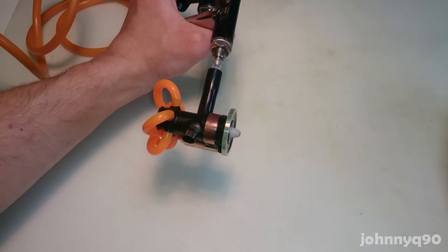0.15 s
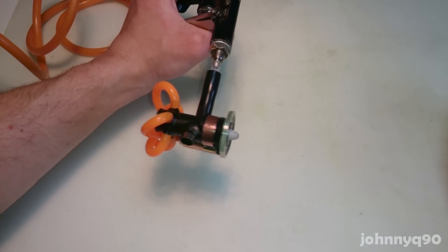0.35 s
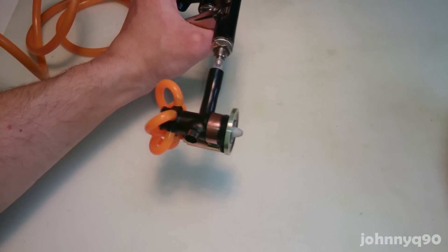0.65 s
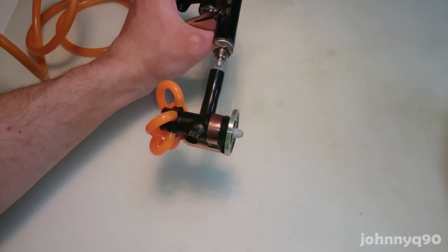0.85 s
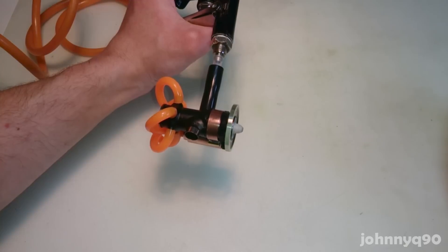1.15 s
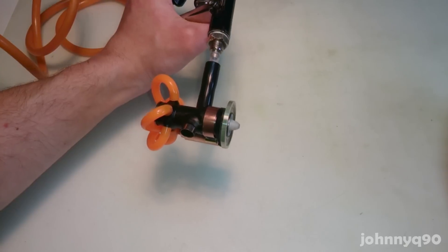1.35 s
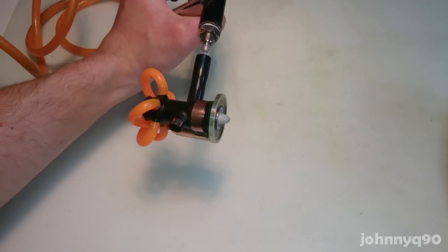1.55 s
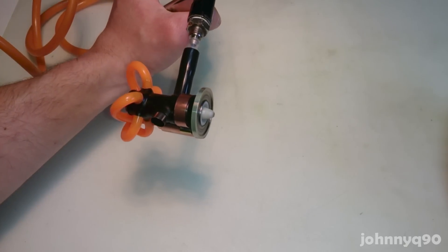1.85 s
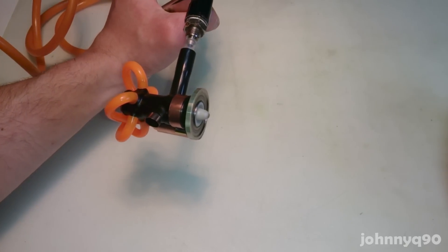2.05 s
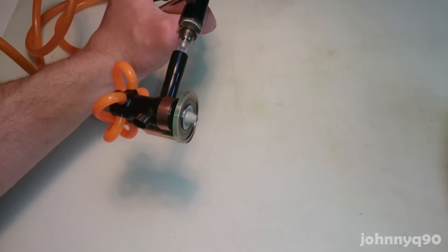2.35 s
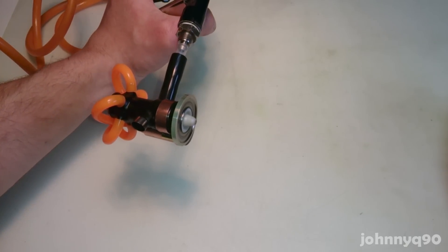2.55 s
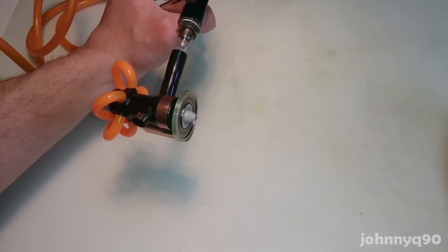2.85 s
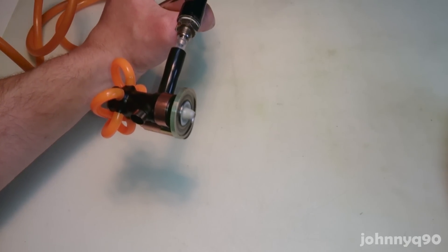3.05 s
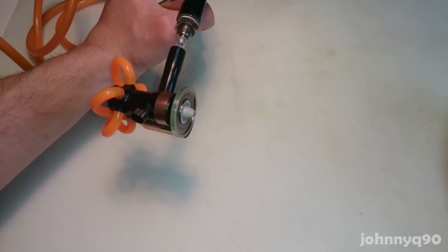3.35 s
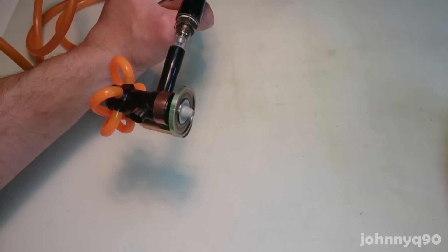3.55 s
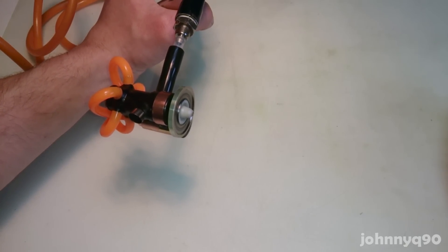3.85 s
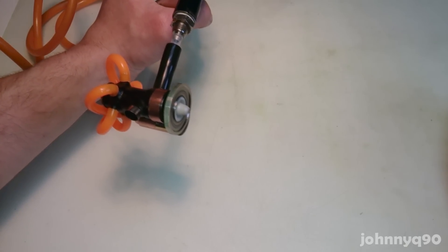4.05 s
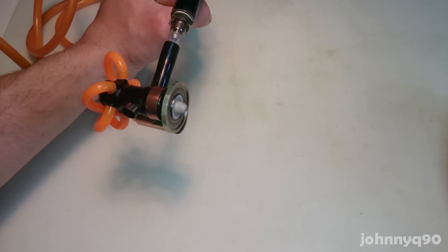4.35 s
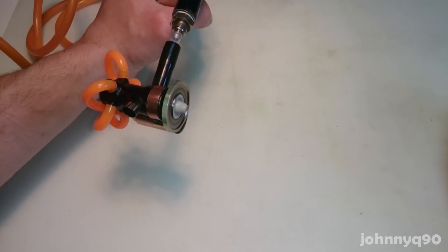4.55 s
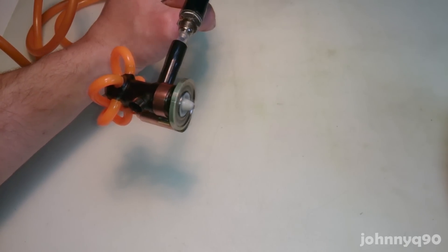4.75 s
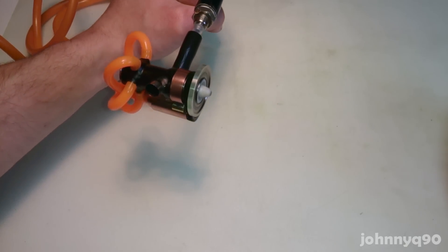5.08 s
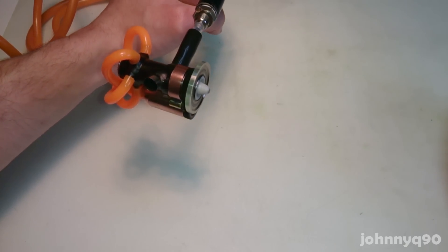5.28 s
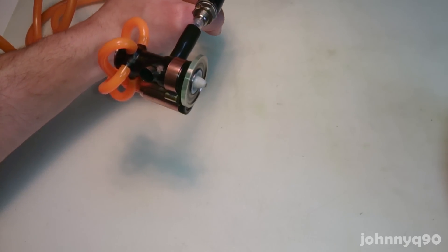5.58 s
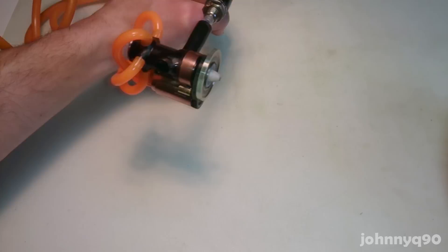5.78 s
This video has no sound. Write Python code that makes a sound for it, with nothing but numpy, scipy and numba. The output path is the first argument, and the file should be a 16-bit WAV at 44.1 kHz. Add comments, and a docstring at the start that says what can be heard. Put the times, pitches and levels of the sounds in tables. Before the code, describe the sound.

A small air-driven rotor whines and hisses, coasts down with a dry metallic rattle, then spins up again in a climbing whine.

```python
"""A small hand-held rotary air engine runs above a table, fed from a blow gun.
Its rotor chops the air five times a turn into a rising whine, wrapped in exhaust rush and jet hiss.
At 1 s the air is shut off and the engine coasts down with a dry metallic rattle and a few hard knocks.
From 2.56 s the air drives it up again; the whine climbs until the trigger eases at the very end."""
import sys
import numpy as np
from scipy import signal
from scipy.fft import rfft, irfft, next_fast_len
from scipy.io import wavfile
from numba import njit

SR = 44100
rng = np.random.default_rng(int(sys.argv[2]) if len(sys.argv) > 2 else 0)


def generate_wav(sig):
    """Save sig (samples, or channels by samples) to the path in sys.argv[1] as 16-bit PCM at SR."""
    pcm = np.round(np.clip(np.atleast_2d(sig).T, -1, 1) * 32767).astype(np.int16)
    wavfile.write(sys.argv[1], SR, pcm)


N = 261072
TIME = np.arange(N) / SR
FREQS = np.arange(N // 2 + 1) * SR / N
PUFFS_PER_TURN, CRUISE_PUFF_HZ = 5, 700

# squeezes of the blow gun's trigger: (opens [s], fully shut [s], extra chamber drive [dB])
TRIGGER_SQUEEZES = [(-1, 1.03, 2.3), (2.56, 5.962, 0)]
# air pressure while the trigger is held: (time [s], relative level [dB])
AIR_PRESSURE = [(.9, 1.7), (2.7, -.3), (3.75, 0), (3.9, .9), (4.55, .8), (4.92, -.5), (5.02, 1.9),
                (5.75, 2.2)]
# rotor speed, the pitch of the whine: (time [s], puff rate [Hz])
ROTOR_SPEED = [(0, 733), (.2, 795), (.5, 859), (.75, 898), (.88, 882), (1, 852), (2.56, 497), (2.7, 499),
               (3.4, 574), (3.78, 592.5), (4.2, 637), (4.68, 674), (4.96, 680.5), (5.5, 737), (5.77, 755),
               (5.92, 747)]
# partials of the whine: (multiple of puff rate [x], level at cruise [dB], change per speed doubling [dB])
WHINE_HARMONICS = [(1, -1.2, -1.9), (2, -.6, 1), (3, -2.2, 7), (4, -8, -7)]
# resonances of the outlet and its surroundings: (centre [Hz], width [Hz], gain [dB])
OUTLET_RESONANCES = [(537, 150, -37.5), (592, 44, -36), (617, 28, -36), (657, 20, -40.5), (696, 32, -32),
                     (760, 90, -31.5), (823, 62, -28), (878, 82, -39), (1056, 200, -34.5), (1405, 250, -28),
                     (1591, 89, -34), (1775, 260, -26), (2060, 230, -27), (2360, 340, -23.5),
                     (3100, 1400, -36)]
# midrange body of the exhaust: (frequency [Hz], relative level [dB])
EXHAUST_EQ = [(40, -44), (150, -31.5), (300, -19), (470, -14), (650, -22), (850, -15), (1150, -18),
              (1400, -7), (1650, -2), (2100, 2), (2600, -3.5), (3400, -10.5), (6000, -63)]
# bright top of the jet: (frequency [Hz], relative level [dB])
JET_EQ = [(1500, -38), (2800, -16.5), (3700, -12), (4600, -12), (6300, -11.5), (7400, -7), (8700, -4.5),
          (9900, .5), (10800, -2.5), (12200, -4), (13200, -9), (15000, -8), (15700, -11)]
# breathy whistle of leaking air: (time [s], pitch [Hz], relative level [dB])
LEAK_WHISTLE = [(0, 11820, 8.5), (.9, 11820, 7.5), (2.6, 11350, 6), (4.1, 11250, 4.5), (5.2, 10540, 2),
                (5.9, 10580, 9)]
# partials of the turning rotor: (multiple of turning rate [x], relative level [dB])
SHAFT_HARMONICS = [(1, 0), (2, 0), (3, -10), (6, 0), (7, -4)]
# resonances of the housing: (centre [Hz], width [Hz], gain [dB])
HOUSING_RESONANCES = [(136, 24, -52.5), (172, 130, -53.5), (248, 90, -54.5), (335, 85, -49),
                      (462, 110, -41.5), (1050, 700, -54.5)]
# lower notch in the hiss, shifting as the engine is turned: (time [s], centre [Hz], depth [0-1])
LOWER_NOTCH = [(0, 3600, 0.7), (1, 3640, 0.84), (2.6, 3500, 0.74), (3.6, 3420, 0.5), (4.6, 3450, 0.59),
               (5.3, 3680, 0.39), (5.9, 3930, 0.36)]
# its upper companion: (time [s], centre [Hz], depth [0-1])
UPPER_NOTCH = [(0, 3900, 0.87), (1, 3920, 0.76), (2.6, 4640, .15), (3.3, 4600, 0.24), (4.4, 4700, 0.85),
               (5.1, 4300, .45), (5.9, 3860, .4)]
# reflection off the hand, shifting as the engine is turned: (time [s], delay [s])
HAND_REFLECTION = [(0, .000508), (1.3, .000508), (2, .000708), (4.2, .00071), (5, .000745), (5.3, .00077),
                   (5.9, .0008)]
# reflections off hand, arm and table: (multiple of the hand's delay [x], gain [linear])
REFLECTION_TAPS = [(1, 0.013), (2.35, 0.12), (3.9, -0.016), (6.2, 0.15), (9.7, -0.15)]
# low rumble of the room: (frequency [Hz], relative level [dB])
ROOM_EQ = [(20, 4), (50, -3.5), (110, -8.5), (180, -13), (400, -9.5), (1000, -23.5), (4000, -31)]
# metallic ring of the rattle: (frequency [Hz], relative level [dB])
RATTLE_EQ = [(100, -33), (330, -39), (600, -38.5), (830, -24), (1200, -29.5), (2000, -24.5), (3000, -19),
             (7200, -10), (8500, -1.5), (9050, -1), (9550, 0.5), (10200, 3.5), (12000, -12), (15800, -25.5)]
# hardest knocks of the loose rotor: (time [s], relative level [dB])
ROTOR_KNOCKS = [(1.256, -14), (1.6301, -14), (1.9046, -10), (2.0148, -7.5), (2.0507, -18), (2.0857, -8),
                (2.1187, -6), (2.3914, -13), (2.4014, -20), (2.4782, -18)]
# direct part of the noise on the right: (frequency [Hz], gain [0-1])
RIGHT_DIRECT = [(100, 0.35), (700, 0.82), (1500, 1), (2500, 0.35), (4000, 0.1), (8000, 0.12), (15000, 0.12)]
# off-axis dullness of the right microphone: (frequency [Hz], level against the left [dB])
RIGHT_EQ = [(100, -2), (700, -6), (1700, -6.5), (3000, -9.5), (4500, -13), (7000, -12), (9800, -18.5),
            (11500, -6.5), (12600, -20), (13600, -8), (14700, -15), (15700, -2)]


def from_db(db):
    """Decibels to gain."""
    return 10 ** (np.asarray(db) / 20)


def unit_rms(x):
    """Scale to unit power."""
    return x / np.sqrt(np.mean(np.abs(x) ** 2) + 1e-20)


def automation(rows):
    """One curve per column after the time, sample by sample."""
    times, *columns = np.transpose(rows)
    return [np.interp(TIME, times, column) for column in columns]


def eq_curve(points):
    """Spread a spectrum over all frequency bins, on a log axis."""
    hz, value = np.transpose(points)
    return np.interp(np.log(np.maximum(FREQS, 1)), np.log(hz), value)


def equalise(x, eq):
    """Filter by a smooth spectrum."""
    return irfft(rfft(x) * from_db(eq_curve(eq)), N)


def drift(rate_hz, hop=8):
    """Random modulation, spread 1, rolling off above the given rate."""
    size = next_fast_len(N // hop + 2)
    hz = np.arange(size // 2 + 1) * SR / hop / size
    slow = irfft(rfft(rng.standard_normal(size)) / (1 + (hz / rate_hz) ** 2), size)
    return np.interp(np.arange(N) / hop, np.arange(size), unit_rms(slow))


def narrow_noise(hz, width_hz):
    """Two unrelated narrow noise bands around a moving centre."""
    phase = 2 * np.pi * np.cumsum(hz) / SR
    pair = [drift(width_hz / 2) * np.cos(phase) + drift(width_hz / 2) * np.sin(phase) for _ in range(2)]
    return unit_rms(np.array(pair))


def resonance_gain(resonances, hz):
    """How strongly a body with steep resonances radiates this pitch."""
    return sum(from_db(db) / (1 + (2 * (hz - centre) / width) ** 2) ** 2
               for centre, width, db in resonances)


def valve(attack_s=.066, release_s=.165):
    """Each squeeze builds the air up, then pinches it off: gives flow (0-1) and chamber drive."""
    flow = drive = 0
    for opens, shut, drive_db in TRIGGER_SQUEEZES:
        swell = 1 - np.exp(-np.maximum(TIME - opens, 0) / attack_s)
        burst = swell * np.clip((shut - TIME) / release_s, 0, 1)
        flow += burst
        drive += from_db(drive_db) * burst
    return flow, drive


def rotor(wobble=0.00076):
    """Puff rate and shaft angle; while coasting, drag lengthens each turn at a steady pace."""
    times, rates = np.transpose(ROTOR_SPEED)
    puff_hz = (1 + wobble * drift(17)) / np.interp(TIME, times, 1 / rates)
    return puff_hz, 2 * np.pi * np.cumsum(puff_hz / PUFFS_PER_TURN) / SR


def whine(puff_hz, angle, roughness=0.1, jitter_rad=0.017, turn_depth=0.027):
    """Chopped air, no two puffs alike; each harmonic swells as it crosses an outlet resonance."""
    phase = PUFFS_PER_TURN * angle + jitter_rad * drift(160)
    doublings = np.log2(puff_hz / CRUISE_PUFF_HZ)
    tone = 0
    for k, db, rise_db in WHINE_HARMONICS:
        gain = from_db(db + rise_db * doublings) * resonance_gain(OUTLET_RESONANCES, k * puff_hz)
        tone += gain * np.sin(k * phase)
    return np.sqrt(2) * tone * (1 + roughness * drift(80) + turn_depth * np.sin(angle))


def exhaust_rush(angle, puff_depth=0.083, turn_depth=0.18):
    """Turbulence in the outlet pulses with each puff and each turn."""
    pulsing = 1 + puff_depth * np.cos(PUFFS_PER_TURN * angle) + turn_depth * np.cos(angle)
    return unit_rms(equalise(rng.standard_normal((2, N)) * pulsing, EXHAUST_EQ))


def jet_hiss(angle, hiss_gain_db=14.5, flutter_db=0.29, spit_db=0.5, puff_depth=0.065):
    """Air forced through narrow gaps: a bright, slightly spitting hiss with a breathy whistle."""
    whistle_hz, whistle_db = automation(LEAK_WHISTLE)
    hiss = from_db(hiss_gain_db) * unit_rms(equalise(rng.standard_normal((2, N)), JET_EQ))
    whistle = from_db(whistle_db) * narrow_noise(whistle_hz, width_hz=620)
    flutter = from_db(flutter_db * drift(50) + spit_db * drift(700))
    return (hiss + whistle) * flutter * (1 + puff_depth * np.cos(PUFFS_PER_TURN * angle))


def shaft_hum(puff_hz, angle, flow, waver_db=2.5, sway_rad=0.16, unloaded_db=-13):
    """The unbalanced rotor shakes the housing into a wavering hum, softer without air."""
    turn_hz = puff_hz / PUFFS_PER_TURN
    hum = 0
    for k, db in SHAFT_HARMONICS:
        gain = from_db(db + waver_db * drift(16)) * resonance_gain(HOUSING_RESONANCES, k * turn_hz)
        hum += gain * np.sin(k * angle + sway_rad * drift(25))
    return np.sqrt(2) * from_db(unloaded_db * (1 - flow)) * hum


@njit
def swept_bandpass(x, step, damping):
    """State-variable band-pass with unity gain at its moving centre."""
    out = np.zeros(len(x))
    band_state = low_state = 0.
    for i in range(len(x)):
        g = step[i]
        band = (band_state + g * (x[i] - low_state)) / (1 + g * (g + damping[i]))
        band_state = 2 * band - band_state
        low_state += 2 * g * band
        out[i] = damping[i] * band
    return out


def swept_notch(x, track, width_hz):
    """Scoop a moving hollow out of the hiss."""
    hz, depth = automation(track)
    step = np.tan(np.pi * hz / SR)
    damping = 2 * np.pi * width_hz / SR / np.sin(2 * np.pi * hz / SR)
    return x - depth * np.array([swept_bandpass(layer, step, damping) for layer in x])


def near_reflections(x):
    """Short moving echoes off hand, arm and table comb the noise and make it phase."""
    delay, = automation(HAND_REFLECTION)
    echoes = [sum(gain * np.interp(TIME - k * delay, TIME, layer) for k, gain in REFLECTION_TAPS)
              for layer in x]
    return x + np.array(echoes)


def room_tone(shared_db=-63, width=0.88):
    """A faint bed of low rumble, mostly shared by both sides."""
    shared, left, right = [unit_rms(equalise(rng.standard_normal(N), ROOM_EQ)) for _ in range(3)]
    return from_db(shared_db) * (shared + width * np.array([left, right]))


def contact_decay(hits, decay_s):
    """The power of each contact dies away exponentially."""
    return signal.lfilter([1], [1, -np.exp(-1 / (decay_s * SR))], hits + 1e-18)


def rattle(angle, gain, ticks_per_s=600, spread_db=3, bunching=0.85, tick_db=-4.5, rub_db=-2, knock_db=-8):
    """The unloaded rotor rubs, knocks and ticks on the housing; the ticks bunch twice a turn."""
    chance = ticks_per_s / SR * (1 + bunching * np.cos(2 * angle))
    sizes = from_db(spread_db * np.minimum(rng.exponential(1, N), 4))
    ticks = contact_decay(sizes ** 2 * (rng.random(N) < chance), decay_s=.0005)
    knocks = np.zeros(N)
    for time_s, peak_db in ROTOR_KNOCKS:
        knocks[round(time_s * SR)] = from_db(peak_db + knock_db) ** 2
    chatter = from_db(tick_db) ** 2 * ticks / ticks.mean() + from_db(rub_db) ** 2
    power = gain ** 2 * chatter + contact_decay(knocks, decay_s=.0013)
    metal = equalise(np.sqrt(power) * rng.standard_normal((2, N)), RATTLE_EQ)
    return metal / np.sqrt(np.mean(from_db(eq_curve(RATTLE_EQ)) ** 2))   # cancel the EQ's overall gain


def housing_drone(level_db=-60.5):
    """The slowing rotor wakes a low, sagging resonance of the housing."""
    fade = np.interp(TIME, [1.3, 1.9, 2.6, 2.9], [0, 1, 1, 0])
    hz = np.interp(TIME, [1.9, 2.5], [338, 305])
    return from_db(level_db) * fade * narrow_noise(hz, width_hz=32)


def stereo_image(tones, noise, right_tone_db=-2.5, right_lag_s=.00021):
    """The left microphone faces the engine; the right hears it later, duller and more scattered."""
    near, scattered = noise
    share = eq_curve(RIGHT_DIRECT)
    lag = np.exp(-2j * np.pi * FREQS * right_lag_s)
    direct = (from_db(right_tone_db) * rfft(tones) + share * rfft(near)) * lag
    right = irfft(direct + np.sqrt(1 - share ** 2) * rfft(scattered), N)
    return np.array([tones + near, equalise(right, RIGHT_EQ)])


def scene(exhaust_db=-27.1, jet_db=-25.7, rattle_db=-20.4, rattle_db_per_doubling=13.5):
    """The mix: air pressure rides whine, rush and hiss; the rattle comes up as the flow drops."""
    puff_hz, angle = rotor()
    pressure_db, = automation(AIR_PRESSURE)
    flow, drive = valve()
    chamber_gain = drive * from_db(.3 * pressure_db)   # the chamber takes only part of the swing
    jet_gain = flow ** 1.4 * from_db(jet_db + pressure_db)
    doublings = np.log2(puff_hz / CRUISE_PUFF_HZ)
    rattle_gain = (1 - flow ** 2) * from_db(rattle_db + rattle_db_per_doubling * doublings)
    tones = chamber_gain * whine(puff_hz, angle) + shaft_hum(puff_hz, angle, flow)
    # each noise is a pair: the direct sound, and the sound scattered by the surroundings
    air = chamber_gain * from_db(exhaust_db) * exhaust_rush(angle) + jet_gain * jet_hiss(angle)
    air = swept_notch(air, LOWER_NOTCH, width_hz=460)
    air = swept_notch(air, UPPER_NOTCH, width_hz=330)
    noise = near_reflections(air + rattle(angle, rattle_gain)) + housing_drone()
    return stereo_image(tones, noise) + room_tone()


def record(dry):
    """Peaks clip at full scale, then a steep low-pass cuts the top."""
    cutoff_hz = 15850
    lowpass = 1 / (1 + (FREQS / cutoff_hz) ** 400)
    return irfft(rfft(np.clip(dry, -1, 1)) * lowpass, N)


dry = scene()
out = record(dry)
generate_wav(out)
```